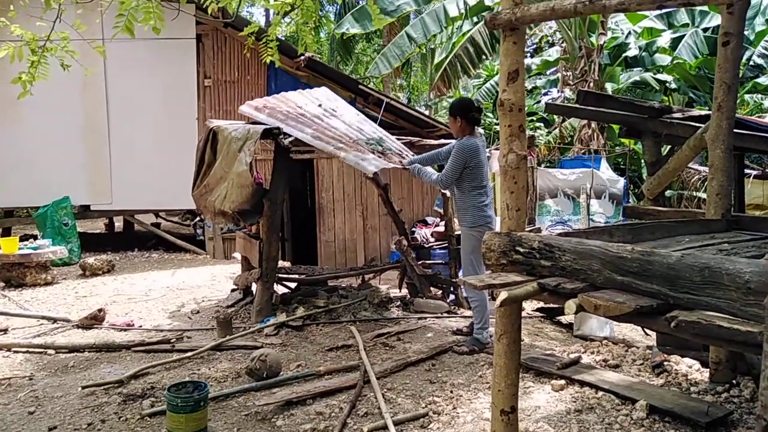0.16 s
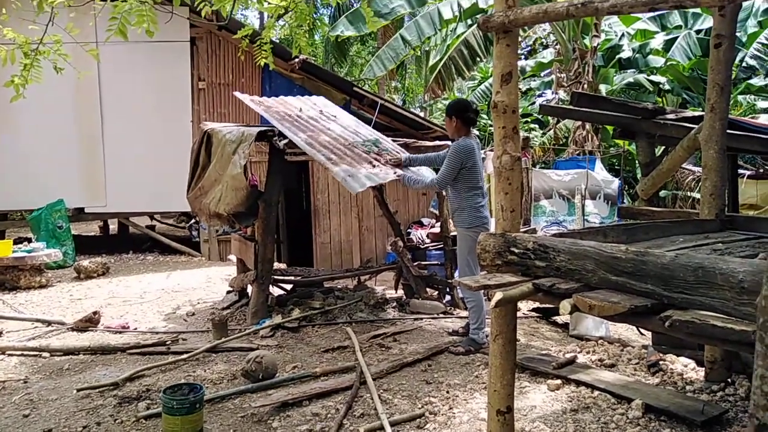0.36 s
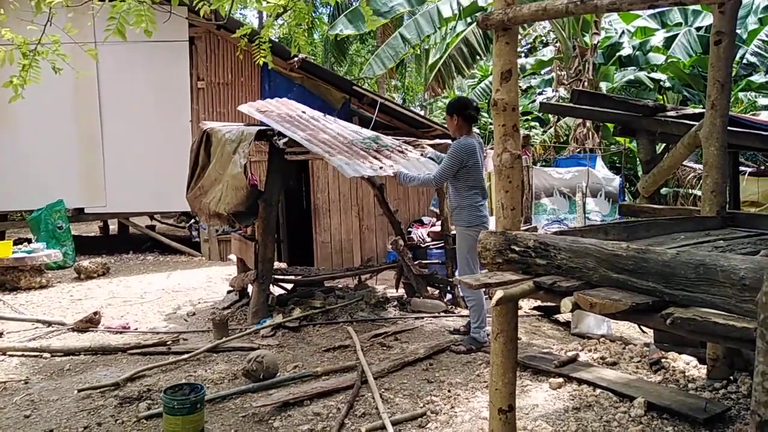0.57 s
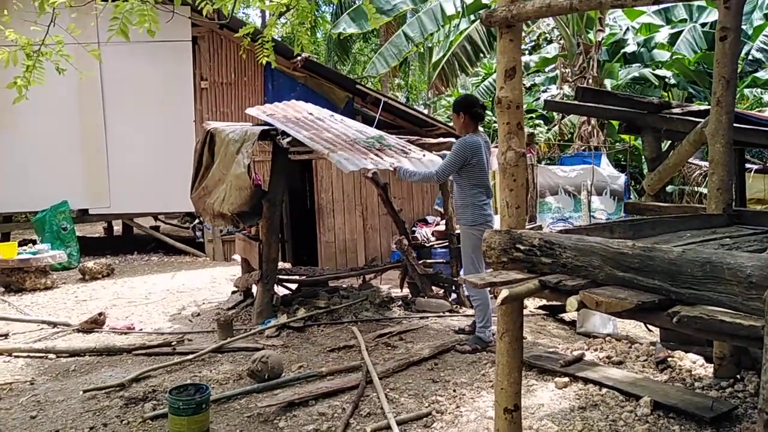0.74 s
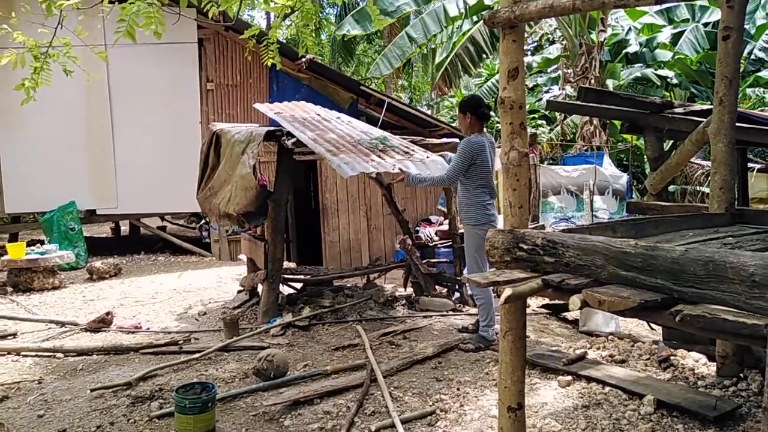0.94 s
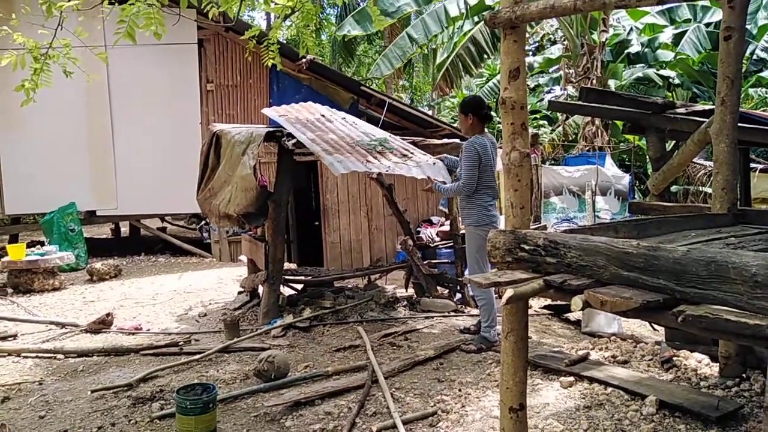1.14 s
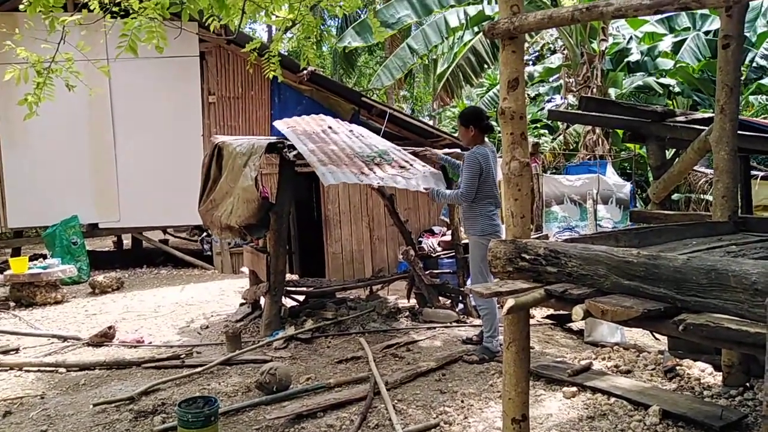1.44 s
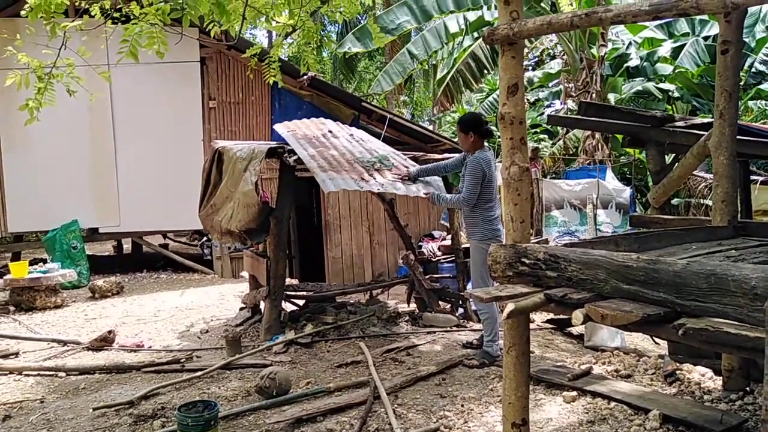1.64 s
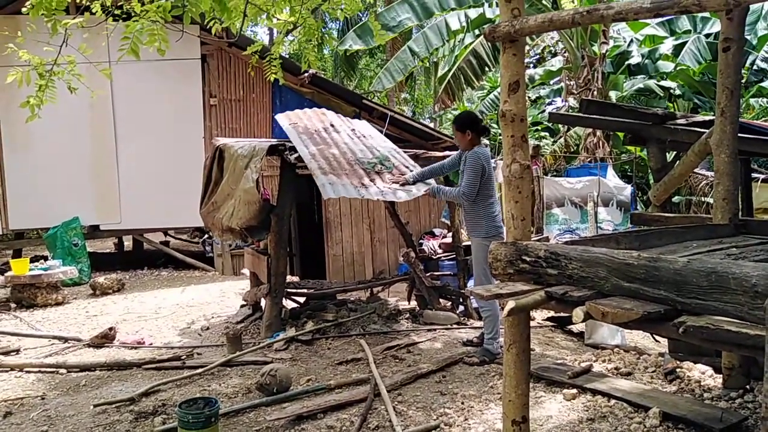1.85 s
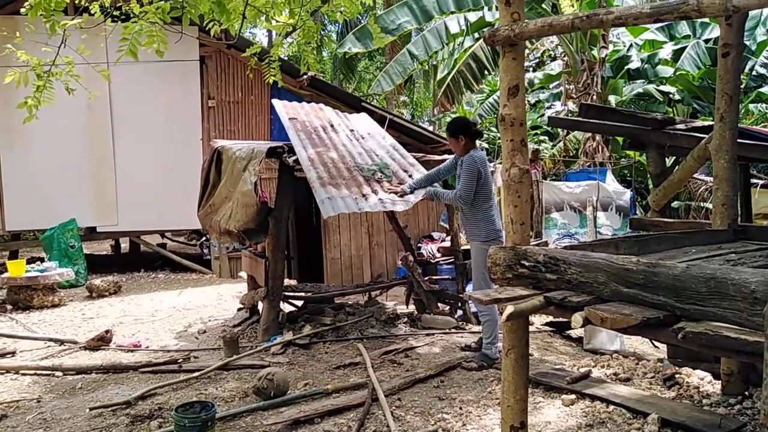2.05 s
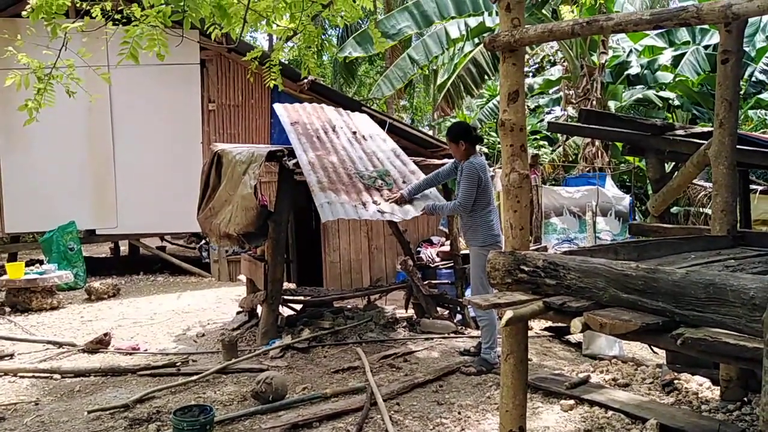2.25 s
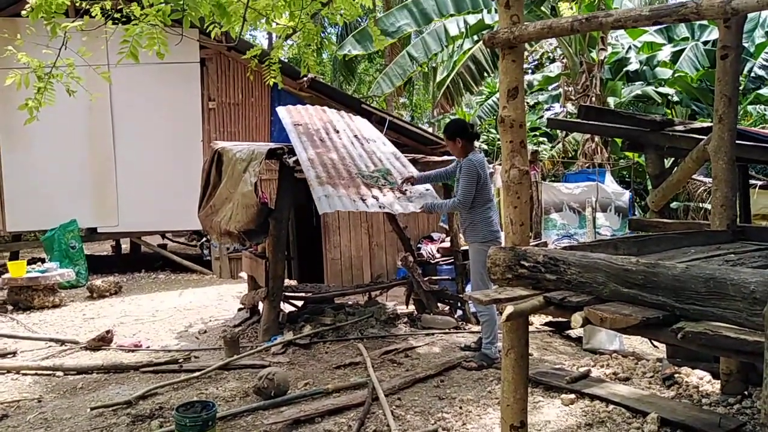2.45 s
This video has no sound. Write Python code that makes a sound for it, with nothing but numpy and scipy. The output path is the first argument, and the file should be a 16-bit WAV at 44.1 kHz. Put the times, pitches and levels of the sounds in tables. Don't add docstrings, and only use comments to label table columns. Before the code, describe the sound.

Corrugated roofing sheet dragged over wood, clattering harshly, pausing for a few dry ticks, then crashing again

```python
import sys
import numpy as np
from scipy import signal
from scipy.fft import irfft
from scipy.io import wavfile
from scipy.ndimage import uniform_filter1d

SR = 44100
rng = np.random.default_rng(int(sys.argv[2]) if len(sys.argv) > 2 else 0)


def amplitude_ratio(level_db):
    exponent = np.asarray(level_db, float) / 20
    return 10 ** exponent


def to_wav(sig):
    pcm = np.clip(np.atleast_2d(sig), -1, 1) * 32767
    pcm = np.round(pcm).astype(np.int16)
    wavfile.write(sys.argv[1], SR, pcm.T)


N = 116865

# (time [s], level [dB], pitch [factor])
STICK_TICKS = [
    (0.896, -23.5, 1.5),
    (1.2068, -9, 1.022),
    (1.4613, -18.5, 0.694),
    (1.7446, -20, 1.2),
]


def evened(x):
    return x / np.sqrt(np.mean(x ** 2) + 1e-20)


def read(points, hz):
    f, value = np.transpose(points)
    return np.interp(np.log(hz + 1), np.log(f + 1), value)


def wander(length):
    noise = rng.standard_normal(N)
    return evened(uniform_filter1d(uniform_filter1d(noise, length), length))


def left_stronger(x):
    return x * amplitude_ratio(np.array([[1.], [-1.]]))


def port(hz):
    centre_hz, width_hz = 7680, 1340
    return 1 / (1 + (2 * (hz - centre_hz) / width_hz) ** 2)


def pair(gain, hz):
    # (frequency [Hz], likeness [0 to 1])
    likeness = [(60, 0), (180, 1), (530, 0.91), (1590, 0.79), (4740, 0.31), (14200, 0.18)]
    # (frequency [Hz], left over right [dB])
    balance = [(60, 3), (370, -1.5), (700, 1), (1400, 1.5), (2500, 2.5), (4300, 7.5), (9500, -3.5),
               (13000, 5.5)]
    port_lean_db, lag_s = -15.5, .00005
    a, b, c, d = rng.standard_normal((len(hz), 4)).T
    same = np.clip(read(likeness, hz), 0, 1)
    lean = amplitude_ratio((read(balance, hz) + port_lean_db * port(hz)) / 2)
    left = a + 1j * b
    right = same * left + np.sqrt(1 - same ** 2) * (c + 1j * d)
    right = right * np.exp(2j * np.pi * hz * lag_s)
    return gain * np.array([left * lean, right / lean])


def yard():
    # (frequency [Hz], level [dB per Hz])
    air = [(30, -24), (80, -12), (130, -14), (220, -18), (400, -11), (620, -18), (1200, -9), (7800, -22),
           (14500, -30)]
    level_db, swell_db = -49, 1.5
    hz = np.fft.rfftfreq(N + 1, 1 / SR)
    floor = evened(irfft(pair(amplitude_ratio(read(air, hz)), hz), N + 1)[:, :N])
    return amplitude_ratio(level_db + swell_db * wander(5000)) * floor


def engine():
    # (multiple of the firing rate, level [dB])
    harmonics = [(2, -81), (3, -67), (4, -56.5), (5, -58.5), (6, -61.5), (7, -65.5), (8, -64)]
    firing_hz, start_turns, smear_turns = 17.59, 0.198, 0.075
    nears_db_per_s, uneven_db = 2, 2.3
    t = np.arange(N) / SR
    turns = firing_hz * t + start_turns
    throb = np.zeros(N)
    for k, db in harmonics:
        phase = k * turns + smear_turns * (k - 5) ** 2
        throb += np.sqrt(2) * amplitude_ratio(db) * np.cos(2 * np.pi * phase)
    return throb * amplitude_ratio(nears_db_per_s * (t - 2.0) + uneven_db * wander(2500))


def stick():
    # (frequency [Hz], bandwidth [Hz], level [dB])
    stick_modes = [(850, 78, -13.5), (1560, 88, -8.5), (2030, 31, 0), (2280, 56, -6), (2640, 41, 1),
                   (3470, 97, -1.5), (4450, 150, -11.5), (5440, 100, -17)]
    level_db, extra_damping_hz = 2, 69.4
    out, t = np.zeros(N), np.arange(2000) / SR
    for s, db, pitch in STICK_TICKS:
        tick = np.zeros(len(t))
        for k, (hz, width_hz, mode_db) in enumerate(stick_modes):
            damping_hz = width_hz + extra_damping_hz
            fade = damping_hz * np.exp(-np.pi * damping_hz * t)
            tick += (-1) ** k * amplitude_ratio(mode_db) * fade * np.sin(2 * np.pi * hz * pitch * t)
        out[round(s * SR):][:len(t)] += amplitude_ratio(db + level_db) * tick / abs(tick).max()
    thud_s, thud_hz, thud_db, thud_length_s = 1.243, 269, -31, 0.0028
    u = np.arange(N) / SR - thud_s
    out += amplitude_ratio(thud_db) * np.exp(-(u / thud_length_s) ** 2) * np.sin(2 * np.pi * thud_hz * u)
    return leaning_left(out)


def leaning_left(x):
    return x * amplitude_ratio(np.array([[1.], [-1.]]))


def pings():
    # (time [s], frequency [Hz], level [dB], length [s])
    singing = [(0.04, 2600, -31.5, 0.0052), (0.13, 2250, -26, 0.0067), (0.223, 981, -19.5, 0.0092),
               (0.432, 968, -22.5, 0.014), (0.541, 2650, -21, 0.008), (1, 1910, -37.5, 0.0084),
               (1.384, 1690, -43.5, 0.02), (1.562, 7920, -40.5, .006), (1.737, 1150, -35.5, 0.0096),
               (1.777, 5170, -17.5, 0.0026), (1.86, 1177, -19.5, 0.0054), (2.127, 1152, -14, 0.0077),
               (2.178, 1214, -13.5, 0.0053)]
    t = np.arange(N) / SR
    rough = 1 + .5 * evened(uniform_filter1d(rng.standard_normal(N), 150))
    tone = np.zeros(N)
    for s, hz, db, length in singing:
        swell = np.exp(-((t - s) / length) ** 2)
        tone += np.sqrt(2) * amplitude_ratio(db) * swell * np.sin(2 * np.pi * hz * t)
    return leaning_left(tone * rough)


def slips(per_s):
    spread_db = 5.5
    size = amplitude_ratio(spread_db * np.minimum(rng.exponential(1, N), 5)) * rng.choice([-1., 1.], N)
    return evened(size * (rng.random(N) < per_s / SR))


def jolts(count):
    jolt_times = [.0355, .1017, .126, .1431, .19, .2833, .376, .399, .4738, .5347, .7073, .7811, .85,
                  1.0784, 1.352, 1.5559, 1.725, 1.7444, 1.7765, 1.8138, 1.8447, 1.8996, 1.927, 1.95, 2.0178,
                  2.1166, 2.136, 2.1789, 2.24, 2.5516]
    # (treble force [dB], body force over treble [dB], chatter length [s])
    jolt_forces = [(-22.5, -17, 0.014), (-2, -32, 0.053), (-2.5, -30, 0.028), (5, -25, 0.051),
                   (-4.5, -10, 0.036), (-5.5, -24.5, 0.0078), (-2.5, -11.5, 0.016), (-18.5, -1, 0.0074),
                   (-8, -14, 0.0092), (-4, -30.5, .02), (-19.5, -4, 0.015), (-20, -0.5, 0.022),
                   (-23.5, -12, 0.025), (-40, 4.5, 0.011), (-19, -4.5, 0.055), (-31, -4, 0.025),
                   (-35.5, 16, 0.034), (-31.5, 3, 0.013), (-10.5, -2.5, 0.016), (-4, -19, 0.023),
                   (-1, -11, 0.025), (-1, -20, 0.022), (-0.5, -15, 0.015), (-0.5, -18, 0.0096),
                   (-1, -20.5, 0.013), (-2, -7, 0.016), (0.5, -12.5, 0.027), (4, -18, 0.042),
                   (-8, -5, 0.014), (-17.5, -23.5, 0.046)]
    level_db, body_level_db = -9, 5.5
    first_hit, hit_share = 22., .15
    t, force = np.arange(N) / SR, np.zeros((count, 2, N))
    chatter = slips(1500)
    for k, (s, (db, body_db, length)) in enumerate(zip(jolt_times, jolt_forces)):
        fade = np.exp(-np.maximum(t - s, 0) / np.clip(length, .002, .2))
        burst = (t >= s) * fade * chatter
        burst[round(s * SR)] = first_hit * amplitude_ratio(hit_share * db)
        burst *= amplitude_ratio(db + level_db) * np.sqrt(SR * .02) / np.linalg.norm(burst)
        force[k % count] += burst * amplitude_ratio(np.array([[0], [body_db + body_level_db]]))
    return force


def grinding():
    # (time [s], pressure [dB], body over treble [dB])
    pressure = [(0.0, -33.5, 4), (0.08, -39.5, 12.5), (0.16, -16.5, 1), (0.29, -16.5, -4),
                (0.37, -22.5, -6.5), (0.4, -17, -0.5), (0.92, -40, -2), (1.33, -36, -16),
                (1.4, -52.5, 13.5), (1.68, -43, -18), (1.79, -31, 2), (1.94, -14, -6.5), (2.03, -18, -6.5),
                (2.11, -29.5, -3), (2.12, -7.5, -8.5), (2.27, -22.5, 2.5), (2.49, -28.5, -4.5),
                (2.65, -29.5, 1.5)]
    level_db, body_level_db = -5, -0.5
    s, db, body_db = np.transpose(pressure)
    t = np.arange(N) / SR
    press = np.interp(t, s, db)
    treble_db = press + level_db
    body_force_db = press + np.interp(t, s, body_db) + body_level_db
    return slips(2500) * amplitude_ratio(np.array([treble_db, body_force_db]))


def sheet_ring(size=20000):
    # (frequency [Hz], level [dB per Hz])
    colour = [(59, -52), (100, -9), (372, 0.5), (667, -8.5), (951, -2.5), (3760, -4.5), (7490, 1),
              (13700, -21), (14600, -14)]
    # (frequency [Hz], time to fall 60 dB [s])
    ring_times = [(150, 0.25), (400, 1), (1000, 0.6), (2000, 0.26), (4000, 0.16), (8000, .22),
                  (13000, 0.12)]
    mode_db, mode_hz = 2.8, 250
    shelf_hz, shelf_db = 700, -11.5
    split_hz, body_rise_s = 2300, 0.0042
    crack_db, crack_s = -2.5, 0.0013
    hz, t = np.fft.rfftfreq(size, 1 / SR), np.arange(size) / SR
    humps = signal.lfilter([1], [1, -np.exp(-SR / size / mode_hz)], rng.standard_normal(len(hz)))
    colour_db = read(colour, hz) + shelf_db / (1 + (hz / shelf_hz) ** 20)
    z = pair(amplitude_ratio(colour_db + mode_db * evened(humps)), hz)
    body_share = 1 / (1 + (hz / split_hz) ** 7)
    crack = 1 + amplitude_ratio(crack_db) * np.exp(-t / crack_s)
    rise = 1 - np.exp(-t / body_rise_s)
    band_hz, band_t60 = np.transpose(ring_times)
    treble, body = 0, 0
    for t60, own_band in zip(band_t60, np.eye(len(band_hz))):
        band = np.sqrt(read(np.column_stack([band_hz, own_band]), hz))
        fade = amplitude_ratio(-60 * t / t60) / np.sqrt(t60)
        treble = treble + irfft(z * band * np.sqrt(1 - body_share)) * fade * crack
        body = body + irfft(z * band * np.sqrt(body_share)) * fade * rise
    return treble / np.linalg.norm(treble[0]), body / np.linalg.norm(body[0])


def sheet(count=7):
    # (time [s], left over right [dB])
    slide = [
        (0, -5.5),
        (.3, -0.5),
        (.6, 1),
        (1.7, 4),
        (1.78, 4),
        (1.9, 2.5),
        (2.65, 2.5),
    ]
    tick_db, tick_treble_db = -19.5, -4.5
    force, drag = jolts(count), grinding()
    shape = rng.integers(0, count, N)
    force[1, 1, 0] += amplitude_ratio(-34) * 20
    for s, db, _ in STICK_TICKS:
        force[0, :, round(s * SR)] += amplitude_ratio(db + tick_db + np.array([tick_treble_db, 0])) * 20
    out = np.zeros((2, 2, N))
    for k in range(count):
        drive = force[k] + drag * (shape == k)
        out += signal.fftconvolve(drive[:, None], np.array(sheet_ring()), axes=2)[..., :N]
    treble, body = out
    lean_db = np.interp(np.arange(N) / SR, *np.transpose(slide)) / 2
    low_cut = signal.butter(2, 102, "high", fs=SR, output="sos")
    return signal.sosfilt(low_cut, treble * amplitude_ratio(np.array([lean_db, -lean_db])) + body)


def scene():
    return yard() + engine() + stick() + pings() + sheet()


def low_pass(x):
    return signal.sosfilt(signal.butter(12, 14750, fs=SR, output="sos"), x)


def record(dry):
    ceiling, edge_hz = 0.93, 14350
    clipped = np.clip(dry, -ceiling, ceiling)
    band_limit = signal.firwin(301, edge_hz, window=("kaiser", 9), fs=SR)
    dull = signal.oaconvolve(clipped, band_limit[None], "same")
    return low_pass(dull)


dry = scene()
out = record(dry)
to_wav(out)
```